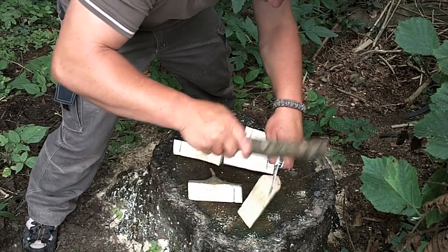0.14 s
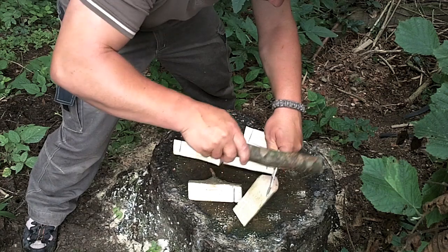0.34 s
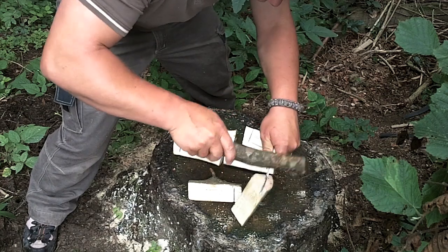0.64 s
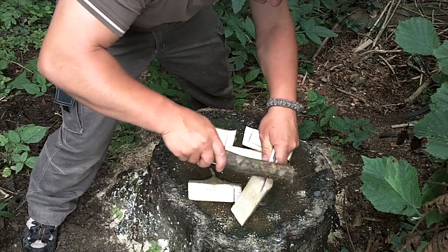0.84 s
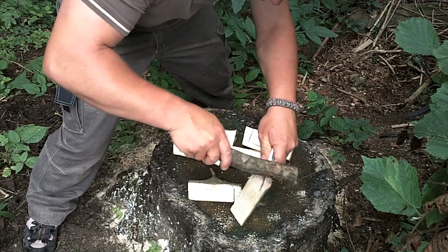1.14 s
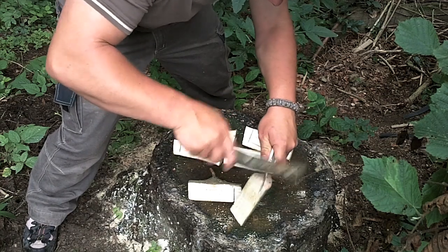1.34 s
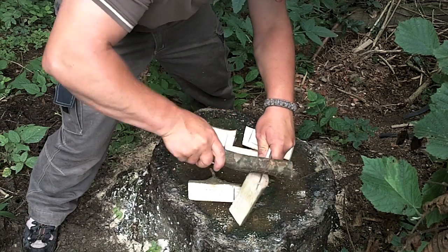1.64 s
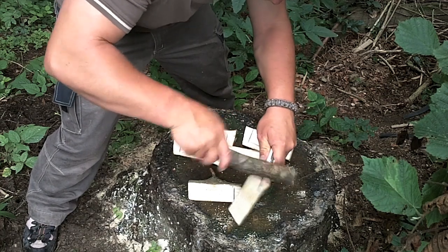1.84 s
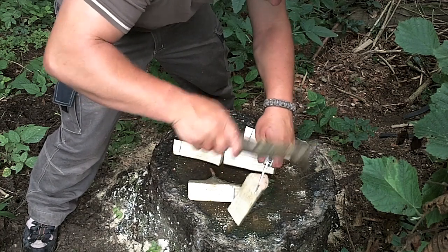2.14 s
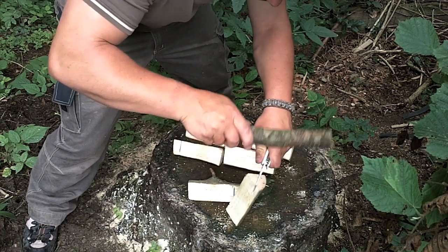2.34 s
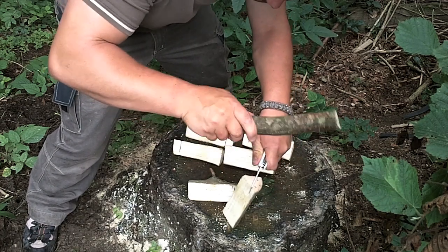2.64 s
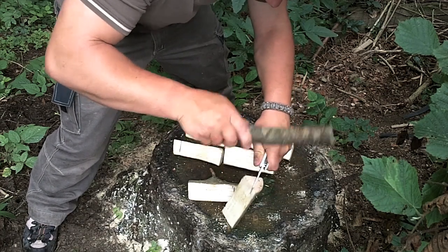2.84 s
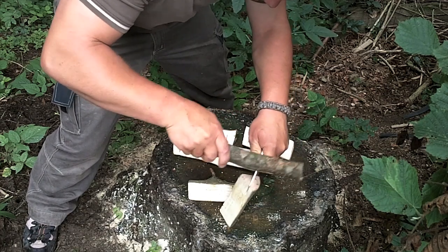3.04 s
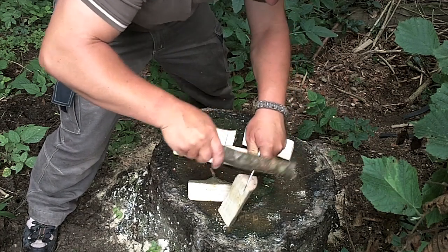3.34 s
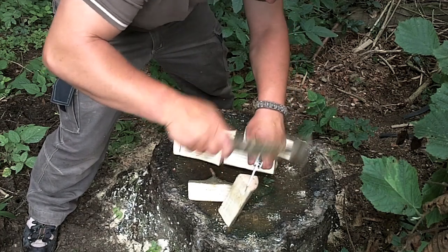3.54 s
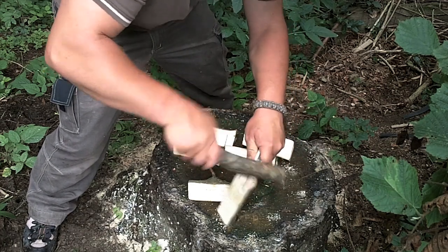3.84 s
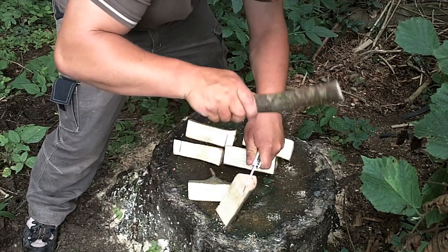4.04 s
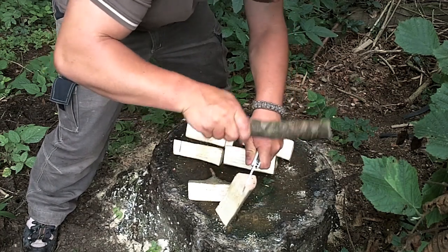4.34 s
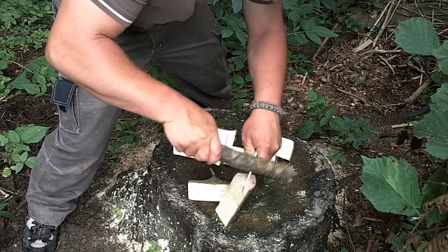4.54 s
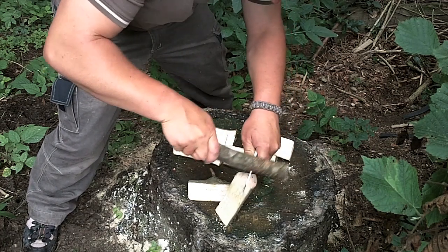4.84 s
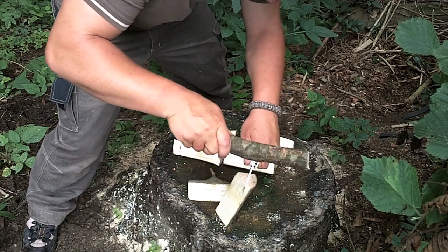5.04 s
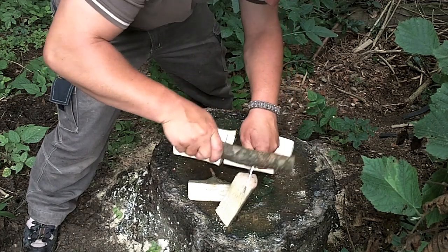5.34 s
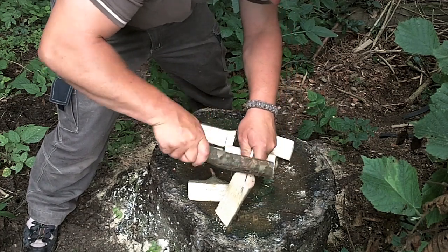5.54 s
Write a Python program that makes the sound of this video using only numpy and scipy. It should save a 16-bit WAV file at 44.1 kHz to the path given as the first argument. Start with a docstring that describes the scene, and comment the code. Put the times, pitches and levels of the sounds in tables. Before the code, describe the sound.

A wooden stick strikes the back of a knife, driving it through a block on a stump. The hard clacks come evenly, about three a second, some hollow and some bright with snapping fibres. Faint ticks come from the split past halfway, and after a short pause two last blows land. The microphone is close, with brief echoes from the trees, soft leaf hiss and a far engine that swells and winds down.

```python
"""Leaves hiss and a far engine hums as a wooden baton starts knocking a knife through a block on a stump.
Each of the even blows is a short, hard clack of baton, blade, block and stump, scattered back by the
trees: hollow when the block sits firmly, bright when the fibres snap. Past halfway the split ticks
faintly between blows, and the engine swells and winds down. After a short pause, two last blows land.
The close microphone colours it all and rounds off the peaks."""
import sys
import numpy as np
from scipy import signal
from scipy.fft import rfft, irfft
from scipy.io import wavfile
from scipy.ndimage import map_coordinates

SR = 44100
rng = np.random.default_rng(int(sys.argv[2]) if len(sys.argv) > 2 else 0)


def log_audio(samples):
    """Write samples as a 16-bit WAV file to the path given in sys.argv[1]."""
    # one column per channel
    frames = np.atleast_2d(samples).T
    # limit to full scale, then quantise
    limited = np.clip(frames, -1, 1)
    pcm = np.round(limited * 32767).astype(np.int16)
    wavfile.write(sys.argv[1], SR, pcm)


N = 250929

# the colour of snapping wood fibres: freq_hz, level_db
CRACK_SPECTRUM = [(300, -22), (1200, 18.5), (3000, -51), (5000, 15), (6200, 7), (7200, 5), (9500, 5),
                  (12500, -1), (15000, 0.5), (16500, -84)]


def amp(db):
    """Decibels to gain."""
    return 10 ** (np.asarray(db) / 20)


def burst(x):
    """Scale a short sound to energy 1."""
    return x / np.sqrt(np.sum(x ** 2) + 1e-20)


def fade(t, t60):
    """Exponential decay, 60 dB down after t60 seconds."""
    return np.exp(-np.log(1000) * t / t60)


def wobble(rate):
    """A smooth random curve, rate knots a second."""
    return map_coordinates(rng.standard_normal(int(N * rate / SR) + 4), [np.arange(N) * rate / SR])


def noise(spectrum, size):
    """Noise of rms 1, coloured by rows of freq_hz, level_db."""
    hz, db = np.transpose(spectrum)
    gain = amp(np.interp(np.log(np.fft.rfftfreq(size, 1 / SR) + 1), np.log(hz), db))
    coloured = irfft(rfft(rng.standard_normal(size)) * gain, size)
    return coloured / np.sqrt(np.mean(coloured ** 2) + 1e-20)


def add(track, start_s, sound):
    """Mix a sound into the track from start_s on."""
    start = round(start_s * SR)
    part = sound[max(-start, 0):max(N - start, 0)]
    track[max(start, 0):][:len(part)] += part


def notch(x, hz, width_hz):
    """Cut a narrow band away."""
    return signal.lfilter(*signal.iirnotch(hz, hz / width_hz, SR), x)


def leaves():
    """A soft bed of leaves and air, breathing with the breeze."""
    # the colour of the hiss: freq_hz, level_db
    hiss_spectrum = [(25, 11.5), (65, 15.5), (100, 12.5), (170, 3), (350, 6), (600, 0.5), (1500, -1),
                     (3300, -0.5), (4800, 1.5), (6300, -7.5), (9500, -11.5), (12000, -18), (15000, -19.5),
                     (15800, -47)]
    breeze_db = 1.2 * wobble(3)
    return amp(-54 + breeze_db) * noise(hiss_spectrum, N)


def far_engine():
    """A distant hum and rumble that swells, then sinks in pitch as the engine winds down."""
    # the engine's run: time_s, pitch_hz, level_db
    run = [(0, 128, -63.5), (1.6, 134.5, -63), (2.6, 130.5, -64.5), (3.2, 126.5, -60), (3.701, 121.7, -55),
           (4.102, 115.5, -58), (4.8, 102, -62), (5.69, 94, -62.5)]
    # its partials: pitch_multiple, level_db, share_of_swell
    partials = [(.5, -8.5, 0.95), (1, -1.5, 0.97), (2, -10.5, 0), (3, -10, 0.19), (4, -13.5, 0.18)]
    time_s, pitch_hz, level_db = np.transpose(run)
    t = np.arange(N) / SR
    swell_db = np.interp(t, time_s, level_db) - level_db[0]
    wavering_hz = np.interp(t, time_s, pitch_hz) * (1 + 0.0018 * wobble(4.16))
    phase = 2 * np.pi * np.cumsum(wavering_hz) / SR
    hum = sum(amp(db + share * swell_db + 1.67 * wobble(2.8)) * np.sin(multiple * phase)
              for multiple, db, share in partials)
    rumble = noise([(15, -2), (30, -4), (70, 5), (150, -7), (600, -32), (3000, -97)], N)
    return amp(level_db[0]) * (np.sqrt(2) * hum + amp(swell_db - 23) * rumble)


def forest_wash(snap_db, baton_hz, blade_hz):
    """A grainy tail off trunks and leaves that keeps the blow's brightness and its two main pitches."""
    # the colour the trees scatter back: freq_hz, level_db
    tree_spectrum = [(150, -18.5), (500, -16.5), (900, -10), (1550, -3), (2200, -3), (3200, -3.5),
                     (4100, 0), (4800, -0.5), (6200, -9), (7000, -13), (9500, -17.5), (12000, -23.5),
                     (15000, -36)]
    t = np.arange(SR * 3 // 4) / SR
    hz = np.geomspace(100, SR / 2, 80)
    tree_hz, tree_db = np.transpose(tree_spectrum)
    db = np.interp(np.log(hz), np.log(tree_hz), tree_db)
    db += 0.5 * (snap_db - 5) * np.log2(hz / 3000)  # more snap, brighter tail
    for pitch_hz, lift_db in ((baton_hz, 4), (blade_hz, 5)):
        db += lift_db * np.exp(-((hz - pitch_hz) / 330) ** 2)
    grain = amp(1.24 * wobble(207.2)[:len(t)])
    swell = amp(np.exp(-((t - 0.075) / 0.11) ** 2))  # from a stand of trees a dozen metres off
    envelope = fade(t, t60=0.6) * (1 - np.exp(-t / 0.0013))
    return noise(np.column_stack([hz, db]), len(t)) * grain * swell * envelope


def echo_response():
    """The quick scatter of a blow off stump, legs and ground, then slaps from single trunks."""
    # big trunks that answer on their own: delay_s, level_db
    trunks = [(0.086, -45.5), (0.096, -46), (0.110, -46), (0.182, -52)]
    # the colour their bark sends back: freq_hz, level_db
    bark_spectrum = [(300, -19), (1100, -6), (1500, -3), (2100, -15), (4500, -11), (9000, -17.5)]
    t = np.arange(SR // 4) / SR
    scatter = noise([(200, 8.5), (800, 2.5), (1600, -1.5), (4500, -2), (12000, -2.5)], len(t))
    response = amp(-17) * burst(scatter * fade(t, t60=0.05) * np.clip(t / 0.0024, 0, 1))
    for delay_s, level_db in trunks:
        envelope = (t > delay_s) * fade(np.abs(t - delay_s), t60=0.027)
        response += amp(level_db) * burst(noise(bark_spectrum, len(t)) * envelope)
    return response


def fibre_ticks():
    """Wood fibres give tiny dry ticks as the blade is reset."""
    # ticks from the split: start_s, level_db
    ticks = [(3.2724, -56.5), (3.3488, -58), (5.023, -48), (5.2238, -50), (5.5653, -52)]
    track, t = np.zeros(N), np.arange(SR // 30) / SR
    for start_s, level_db in ticks:
        add(track, start_s, amp(level_db) * noise(CRACK_SPECTRUM, len(t)) * fade(t, t60=0.016))
    return track


def ring(modes, t, scatter_db, detune):
    """Damped modes of alternating sign; grip and contact point shift them a little at each blow."""
    hz, db, t60 = np.transpose(modes)
    level_jitter, pitch_jitter = rng.standard_normal((2, len(hz)))
    gain = (-1) ** np.arange(len(hz)) * amp(db + scatter_db * level_jitter)
    waves = np.sin(2 * np.pi * np.outer(t, hz * (1 + detune * pitch_jitter)))
    return burst((waves * fade(t[:, None], t60)) @ gain)


def favour(modes, pitch_hz, db_per_octave):
    """The spot where the baton lands favours the modes near one pitch."""
    return [(hz, db - db_per_octave * abs(np.log2(hz / pitch_hz)), t60) for hz, db, t60 in modes]


def radiated(x, corner_hz):
    """A small body radiates little below its corner; the result has energy 1."""
    return burst(signal.sosfilt(signal.butter(2, corner_hz, "highpass", fs=SR, output="sos"), x))


def blade_clink(t, pitch_hz):
    """The struck steel rings, then chatters twice more as it bites into the wood."""
    # the blade's resonances: pitch_hz, level_db, t60_s
    blade_modes = [(3133, 5.5, 0.0036), (3696, 0, 0.0075), (4140, -0.5, 0.0071), (4830, -0.5, 0.01)]
    steel = favour(blade_modes, pitch_hz, db_per_octave=10.5)
    bite_s, rebite_s = rng.uniform(0.00046, 0.001097), rng.uniform(0.001349, 0.002605)
    bite = amp(-4) * ring(steel, np.maximum(t - bite_s, 0), scatter_db=-0.5, detune=0.018)
    rebite = amp(-3) * ring(steel, np.maximum(t - rebite_s, 0), scatter_db=1, detune=0.027)
    strike = ring(steel, t, scatter_db=-0.5, detune=0.01)
    return radiated(strike + bite + rebite, corner_hz=1410)


def fibre_crack(t):
    """Most fibres snap at once, then a few more tear."""
    decay = fade(t, t60=0.0089) + amp(-19.5) * fade(t, t60=0.022)
    attack = 1 - np.exp(-t / 0.0002)
    return radiated(noise(CRACK_SPECTRUM, len(t)) * decay * attack, corner_hz=1490)


def clack(seat_db, snap_db, thud_db, baton_hz, blade_hz):
    """One blow: four bodies ring briefly, the fibres crack and the blade drives in with a dull thud."""
    # resonances of the three wooden bodies: pitch_hz, level_db, t60_s
    stump_modes = [(187, -0.5, 0.019), (347, 4, 0.022)]
    block_modes = [(488, -6, 0.025), (710, 1, 0.019), (1019, -1, 0.017)]
    baton_modes = [(1275, -14, 0.021), (1643, 3.5, 0.007), (2288, -1, 0.0088)]
    t = np.arange(SR // 12) / SR
    # a firm seat passes the blow down into the stump and damps baton and blade
    stump = amp(-13.5 + 1.62 * seat_db) * ring(stump_modes, t, scatter_db=4, detune=0.015)
    block = amp(-2 + seat_db) * ring(block_modes, t, scatter_db=1.23, detune=0.0147)
    knock = ring(favour(baton_modes, baton_hz, db_per_octave=4.5), t, scatter_db=1.44, detune=0.0068)
    baton = amp(9.5 - 0.2 * seat_db) * radiated(knock, corner_hz=850)
    blade = amp(9 - 0.12 * seat_db) * blade_clink(t, blade_hz)
    crack = amp(0.5 + snap_db) * fibre_crack(t)
    thud = amp(-19.5 + thud_db) * radiated(t * np.exp(-t / 0.00027), corner_hz=82)
    # block and baton cancel each other in a narrow gap
    return notch(block - stump - baton - blade + crack + thud, hz=1174, width_hz=40)


def batoning():
    """The baton drives the knife through the block, each blow with its own echoes and forest tail."""
    # the blows (seat is how firmly the block meets the stump):
    # start_s, level_db, seat_db, snap_db, thud_db, blade_hz
    blows = [(0.3065, 0.5, 2, -1.5, -10, 4350), (0.626, 1.5, 1.5, -1.5, -17, 4810),
             (0.9464, 1.65, 1, 0.5, -4, 4850), (1.2157, 1, 4, 1.5, -15, 3670),
             (1.4913, 1, 3, -2.5, -3, 4100), (1.7595, 0.5, 2.5, 0, -12, 4920),
             (2.021, 2, 0, 0.5, 4.5, 4570), (2.3018, 1.5, 0, 1, -19, 4900), (2.5782, 1, 3.5, -2, -6, 4200),
             (2.849, 1.5, -6, -0.5, -8, 4700), (3.1111, 1.5, 1, 2.5, 10.5, 4560),
             (3.4043, 1.5, -9, 1, -1, 4800), (3.7037, 2.5, -8, 2, -7, 4560),
             (3.9893, 2, -7.5, 1.5, 10, 4650), (4.2942, 1.35, -10, 4, -4, 4540),
             (4.5967, 0.5, -5.5, 7.5, -6, 3360), (4.9068, 0, -5.5, 5, -2, 3100),
             (5.4058, -7.5, 11, -6, 0, 3800), (5.663, -3.5, 7, 6, -8, 3800)]
    # the baton's favoured pitch rises with snap and as the split deepens
    baton_base_hz, octaves_per_db, octaves_per_s = 1485, 0.16, 0.06
    track = np.zeros(N)
    for start_s, level_db, seat_db, snap_db, thud_db, blade_hz in blows:
        baton_hz = baton_base_hz * 2 ** (octaves_per_db * snap_db + octaves_per_s * start_s)
        hit = amp(level_db) * clack(seat_db, snap_db, thud_db, baton_hz, blade_hz)
        add(track, start_s, hit)
        add(track, start_s, signal.fftconvolve(hit, echo_response()))
        send_db = -43 + 0.18 * snap_db - 0.29 * seat_db  # a firm seat sends less out to the trees
        add(track, start_s, amp(level_db + send_db) * forest_wash(snap_db, baton_hz, blade_hz))
    # the scene opens on the dying tail of an earlier blow
    add(track, -0.03, amp(-39) * forest_wash(snap_db=-2, baton_hz=baton_base_hz, blade_hz=4570))
    return track


def scene():
    """The wood splitting up close over leaves and engine, in mono."""
    return (batoning() + fibre_ticks() + leaves() + far_engine())[None]


def record(dry):
    """The housing cuts narrow hollows, the preamplifier rounds the peaks, and the top ends steeply."""
    # cancellations in the microphone housing: centre_hz, width_hz
    hollows = [(2715, 246), (5510, 530), (7900, 1310), (10930, 620)]
    ceiling, hardness, top_hz = 0.97, 6, 16600
    x = dry
    for hz, width_hz in hollows:
        x = notch(notch(x, hz, width_hz), hz, width_hz)  # twice, for a deep floor
    rounded = x / (1 + np.abs(x / ceiling) ** hardness) ** (1 / hardness)
    return signal.sosfilt(signal.ellip(10, 0.1, 90, top_hz, fs=SR, output="sos"), rounded)


dry = scene()
out = record(dry)
log_audio(out)
```